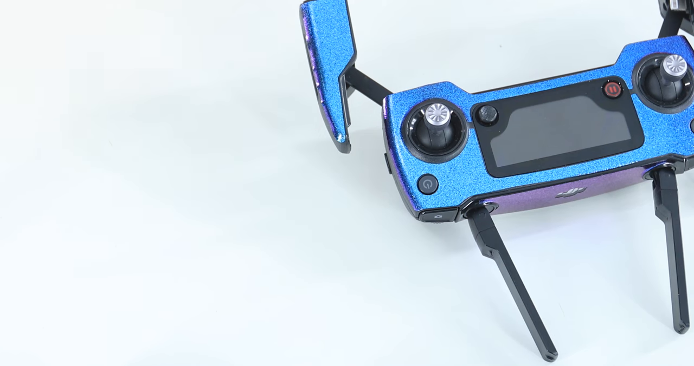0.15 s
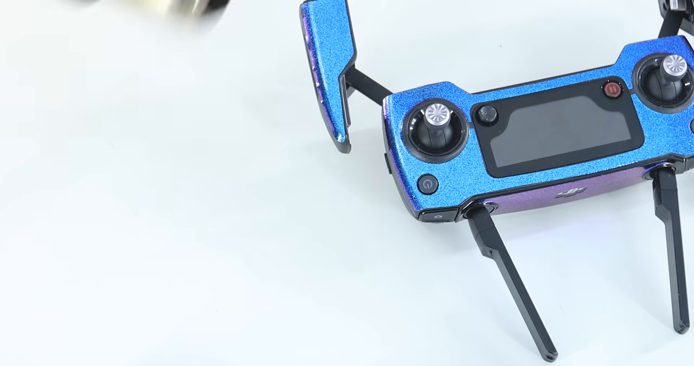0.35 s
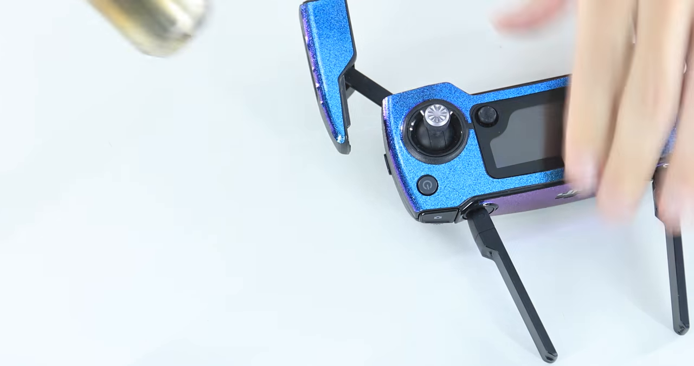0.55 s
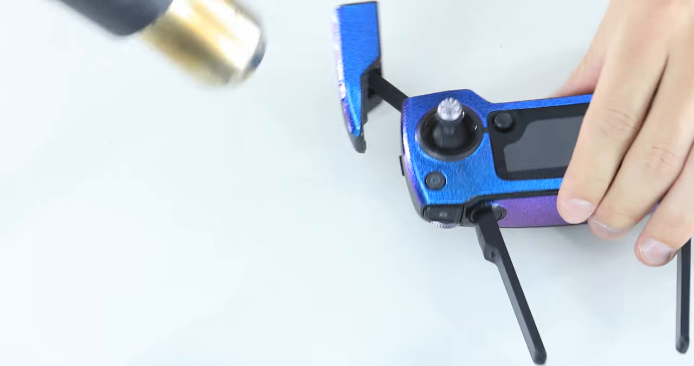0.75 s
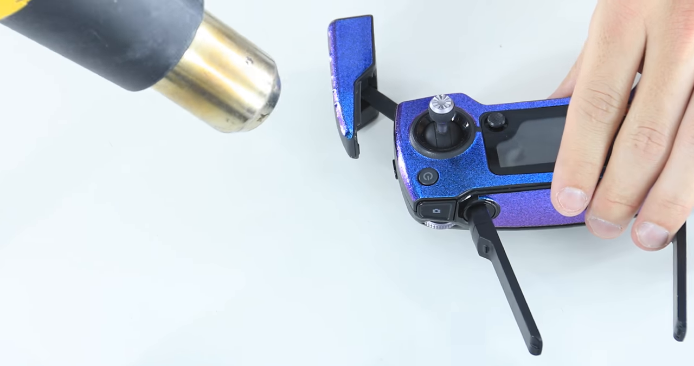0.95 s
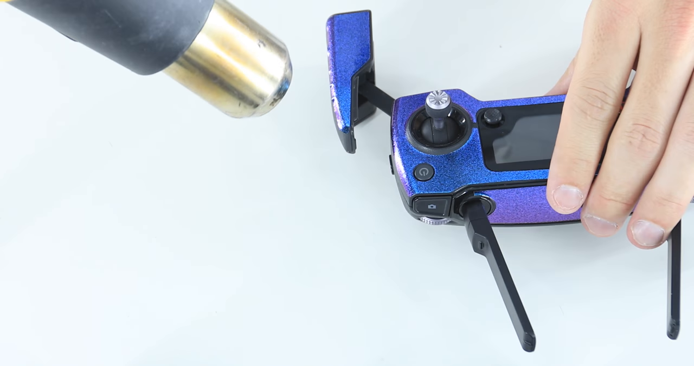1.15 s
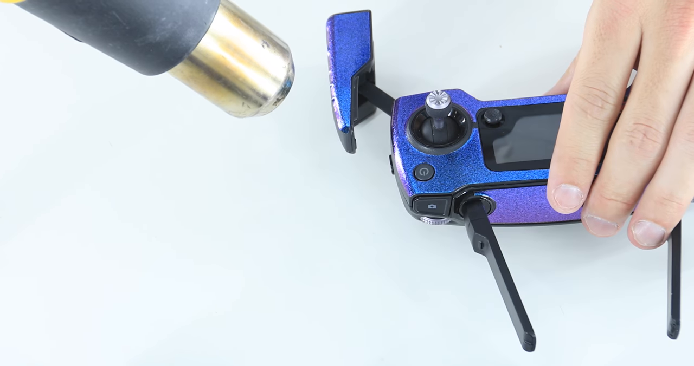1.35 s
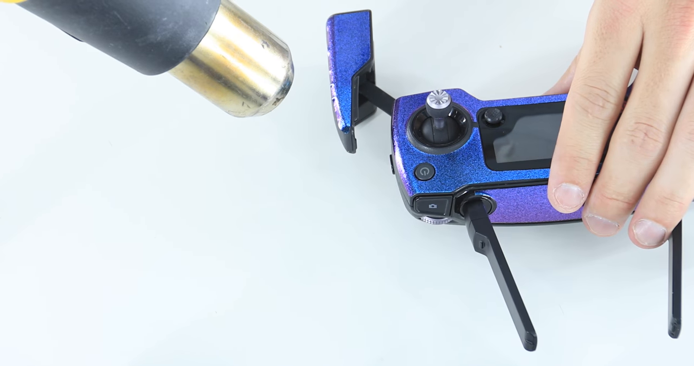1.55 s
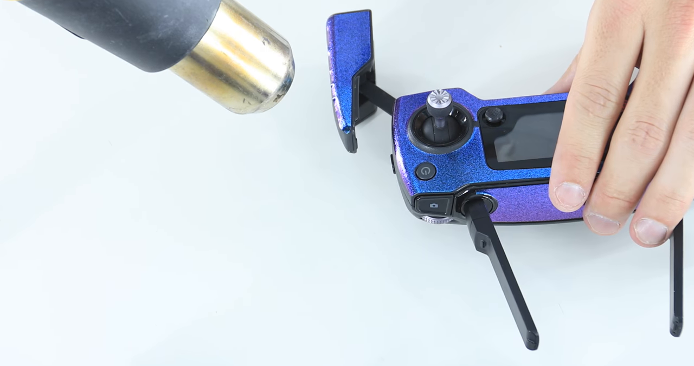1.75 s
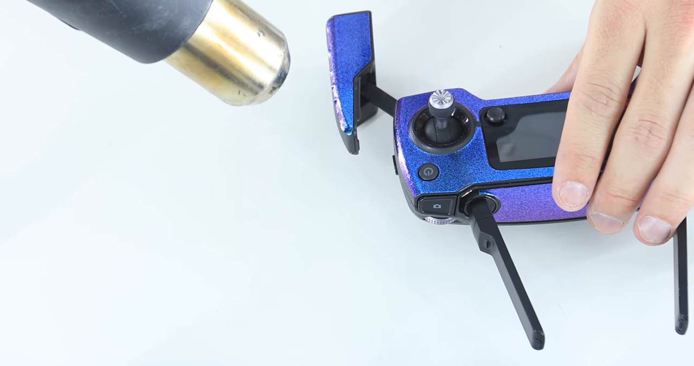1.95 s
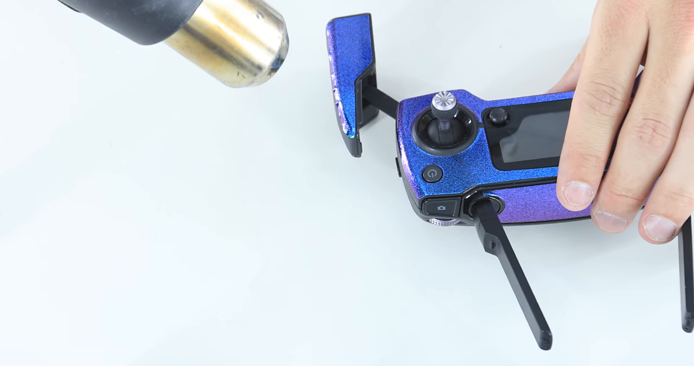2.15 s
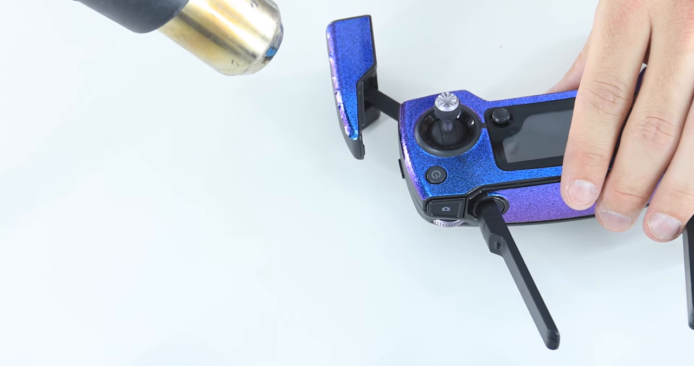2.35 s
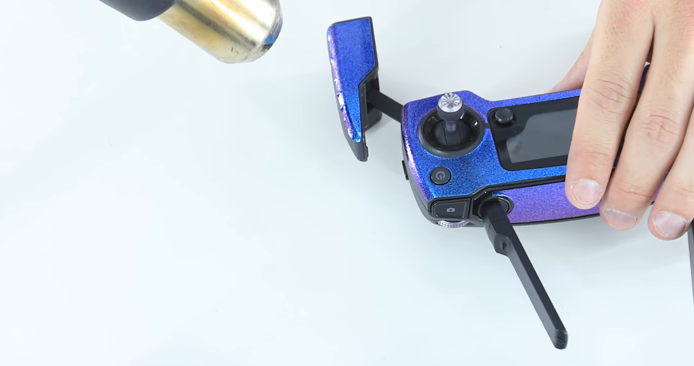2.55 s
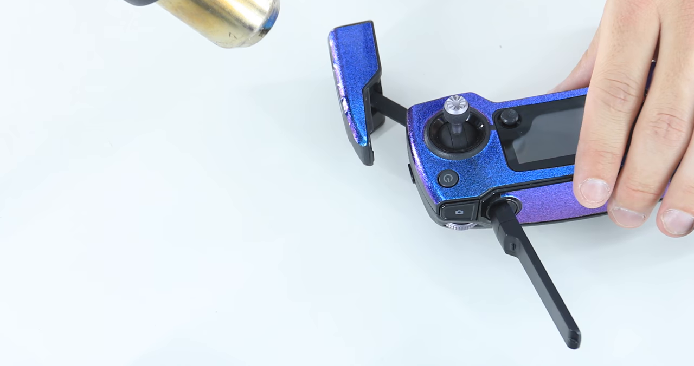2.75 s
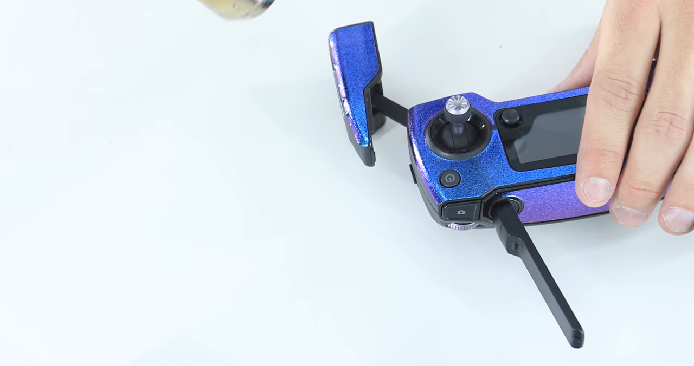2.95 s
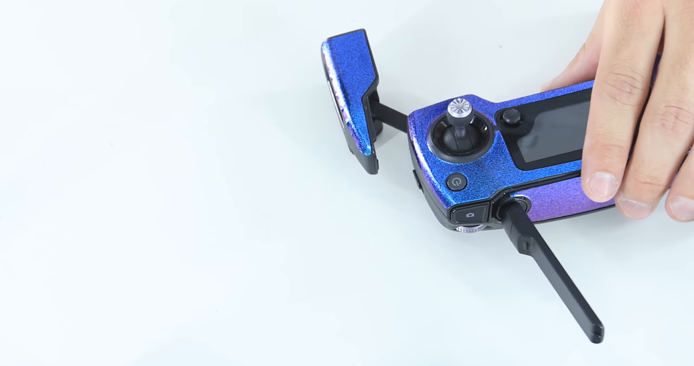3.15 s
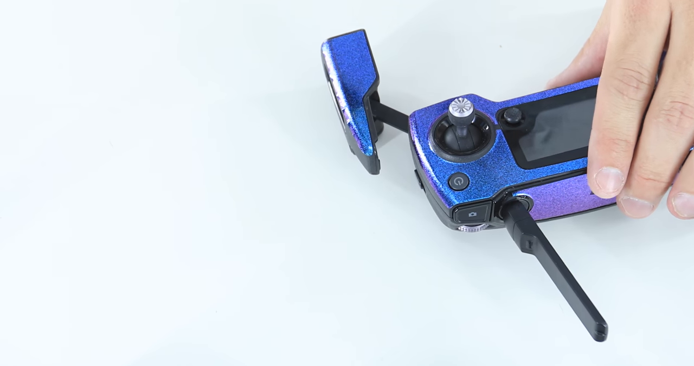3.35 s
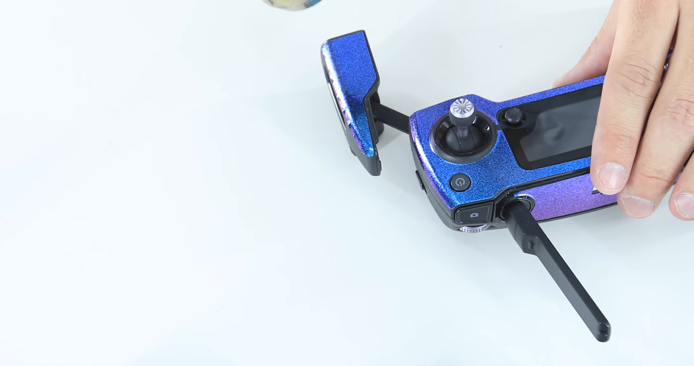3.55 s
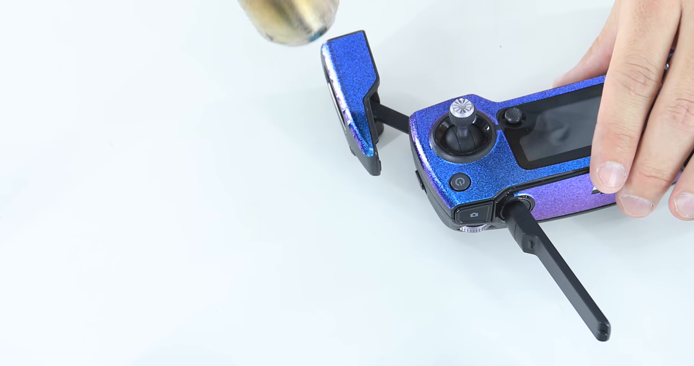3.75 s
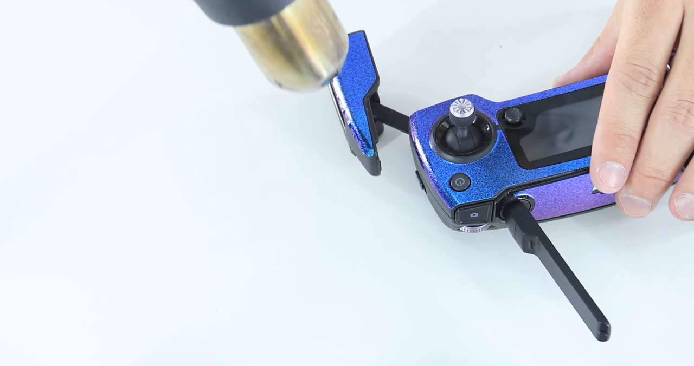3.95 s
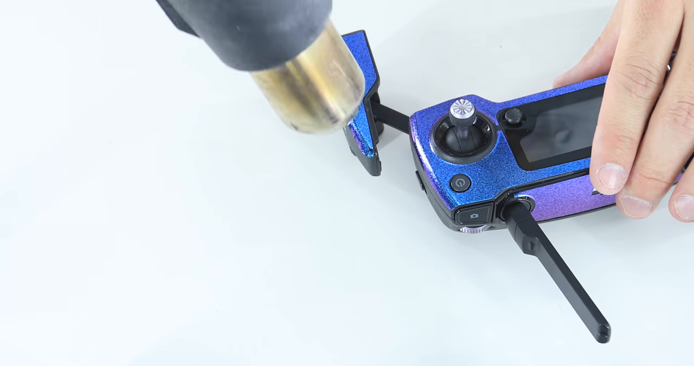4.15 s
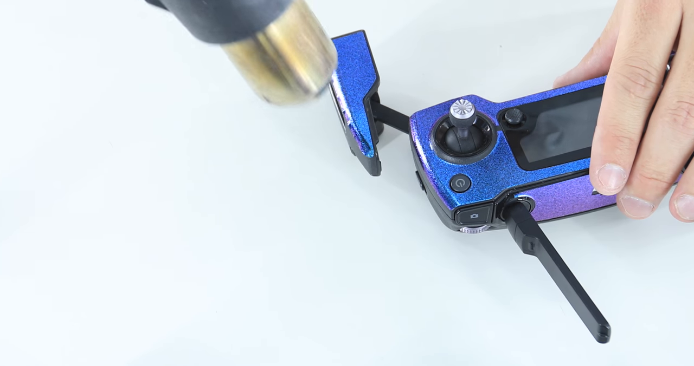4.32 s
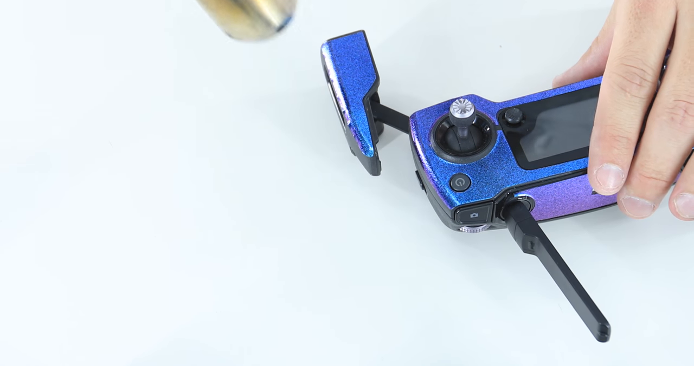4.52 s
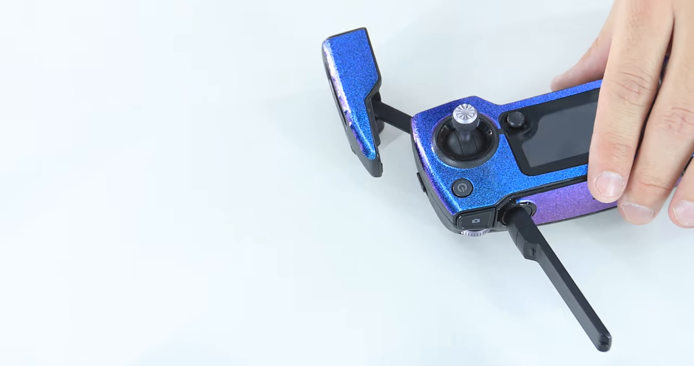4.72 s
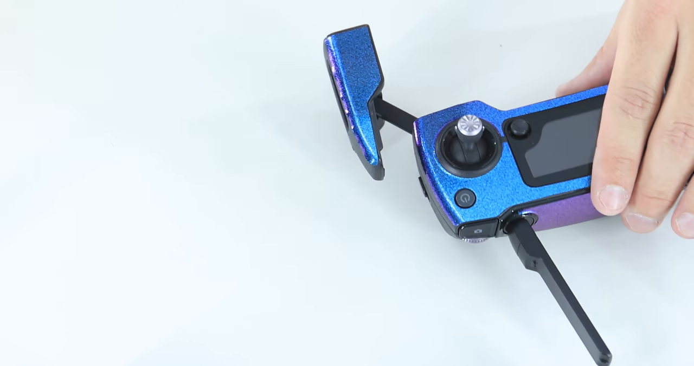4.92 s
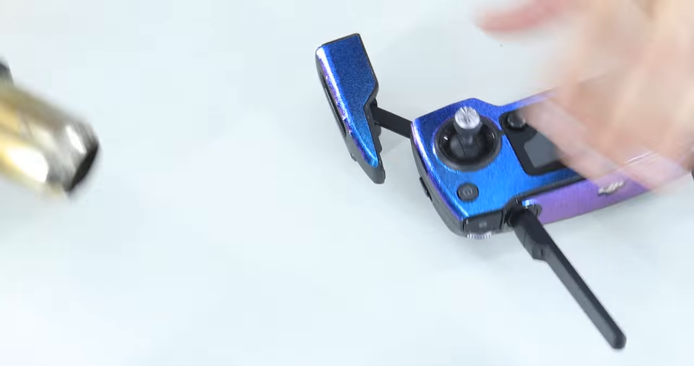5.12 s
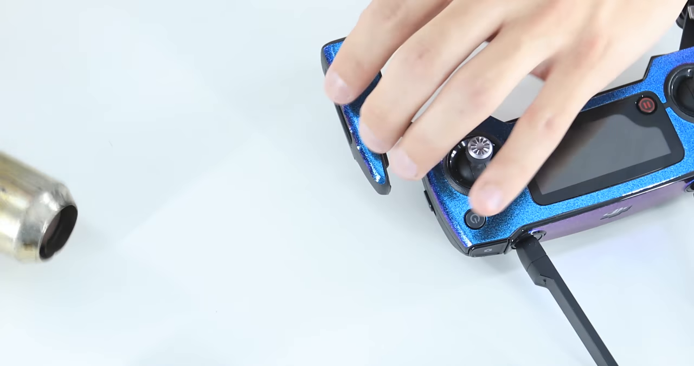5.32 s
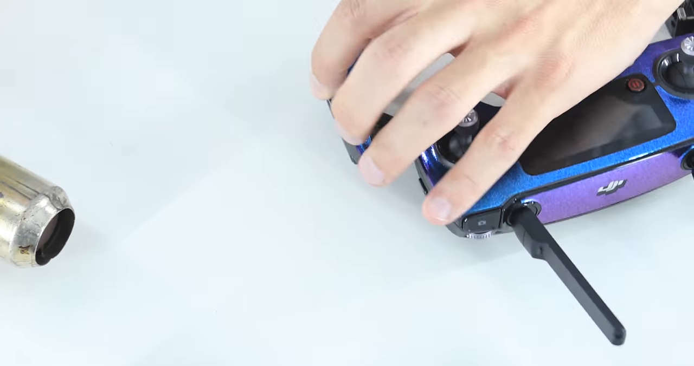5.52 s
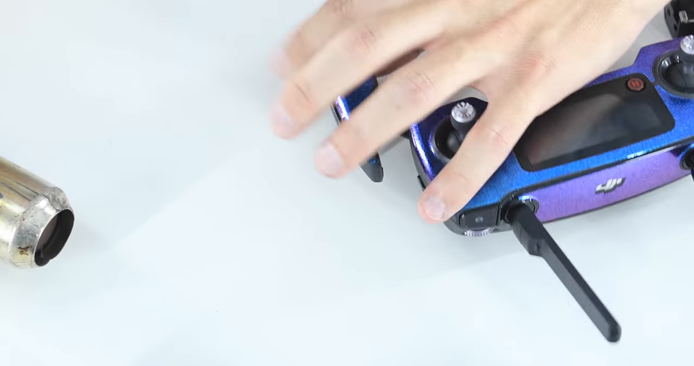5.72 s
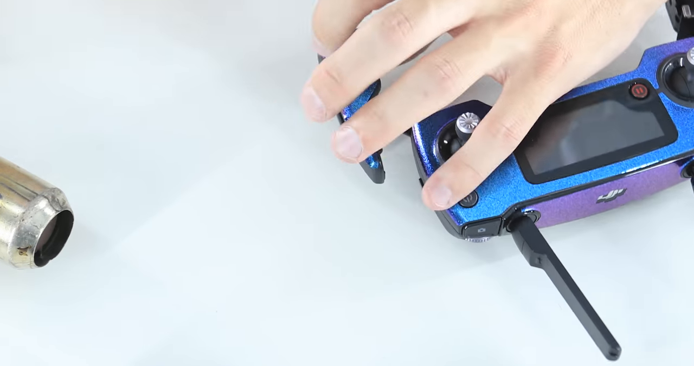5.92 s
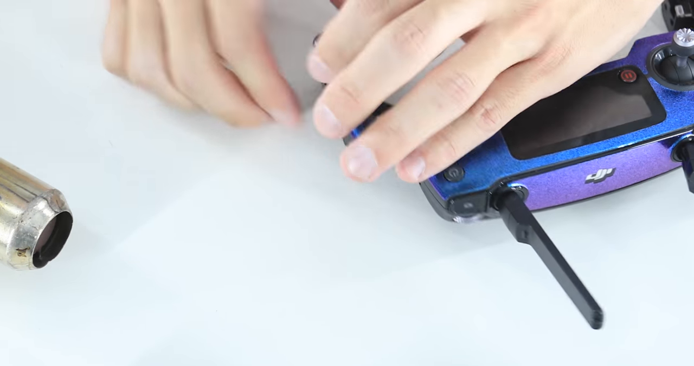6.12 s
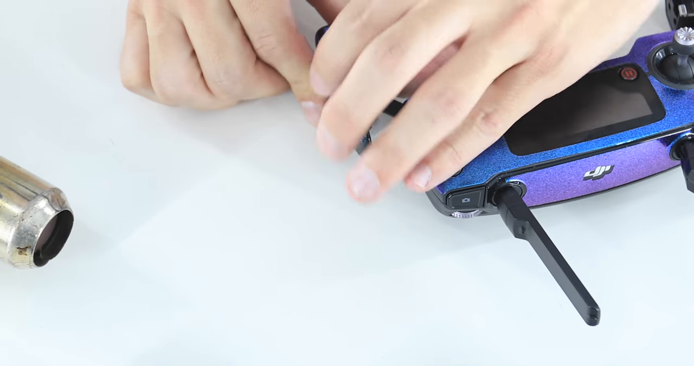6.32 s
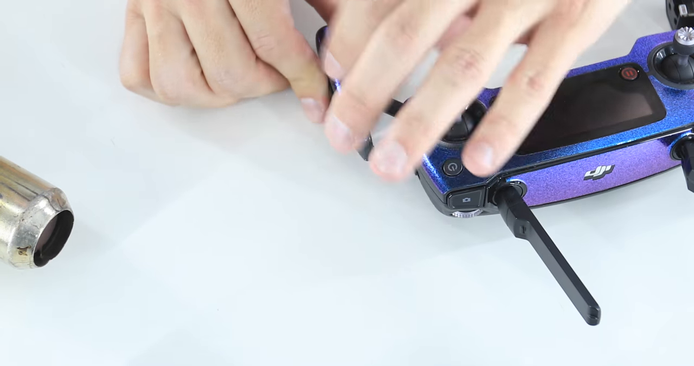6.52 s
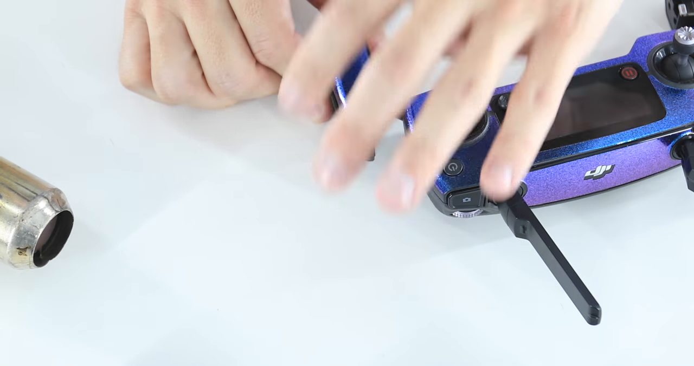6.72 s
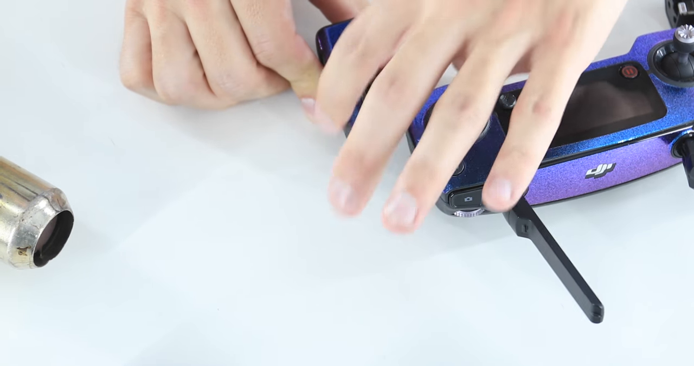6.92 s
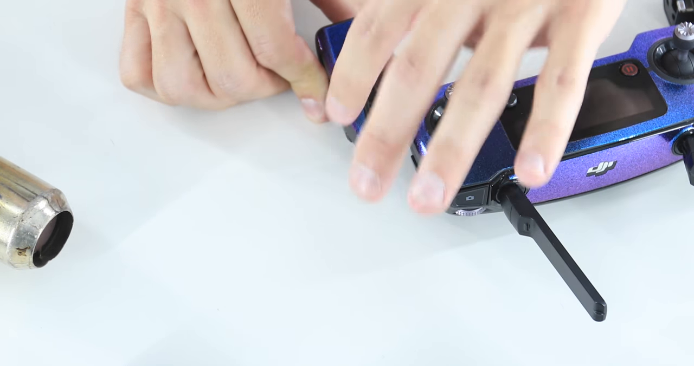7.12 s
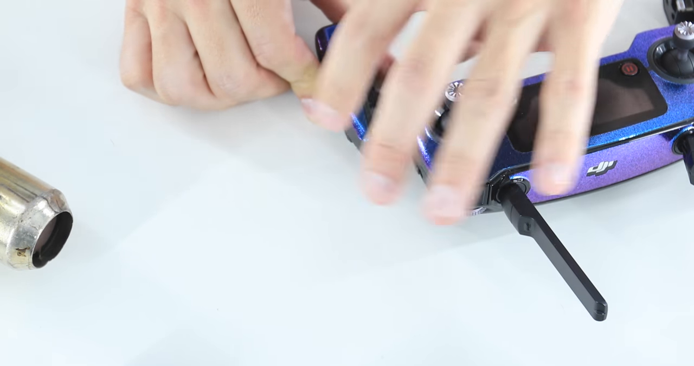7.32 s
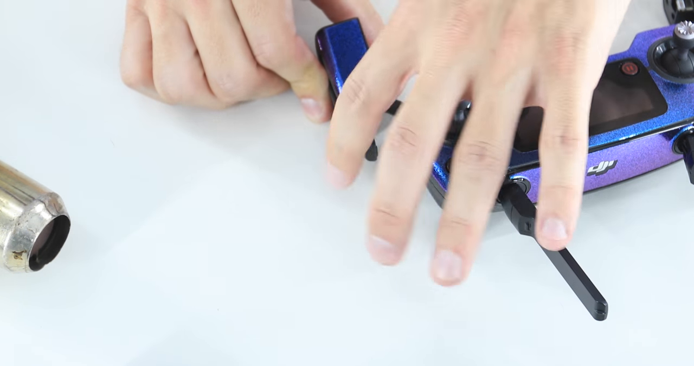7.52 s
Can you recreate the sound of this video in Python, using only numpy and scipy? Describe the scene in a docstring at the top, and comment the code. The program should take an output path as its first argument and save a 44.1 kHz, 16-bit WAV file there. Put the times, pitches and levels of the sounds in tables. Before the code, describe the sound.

Steady hot-air blower rush with a fine motor whine, clicked off and coasting down, followed by two hard table knocks and small plastic taps.

```python
"""In a small room with steady ventilation, a heat gun is switched on, turned about by the hand,
switched off and laid on a table; a plastic case is then handled on the same table.
The whine is a set of tones on multiples of the fan's shaft speed, the rush of air is shaped noise.
Switch and housing tick as short bursts, the table top rings in decaying modes, handling rustles as
soft noise, and sparse echoes form the room. One microphone hears it: both channels are alike."""
import sys
import numpy as np
from scipy import signal
from scipy.io import wavfile
from scipy.ndimage import uniform_filter1d

SR = 44100
rng = np.random.default_rng(int(sys.argv[2]) if len(sys.argv) > 2 else 0)


def persist_wave(psi):
    """Save psi, clipped to +-1, as 16-bit WAV."""
    counts = np.round(np.clip(psi, -1, 1) * 32767).astype(np.int16)
    wavfile.write(sys.argv[1], SR, np.atleast_2d(counts).T)


N = 338218

# Levels are relative within each source unless called rms.
# ventilation colour: (frequency [Hz], spectral level [dB])
VENT_COLOUR = [(20, -47), (50, -29), (100, -29), (135, -21.5), (200, -22.5), (300, -6.5), (550, -3.5),
               (750, -7), (1000, -7), (2700, -7.5), (4000, -13), (6000, -23), (10500, -37.5), (15900, -37)]
# resonances in the ventilation: (frequency [Hz], width [Hz], lift [dB])
VENT_PEAKS = [(169, 40, 11.5), (258, 9.8, 6.5), (494, 11, 8), (584, 24, 2), (855.5, 9.9, 18)]
VENT_RMS_DB = -46
# reverberation of the room: (frequency [Hz], t60 [s])
ROOM_T60 = [(150, 0.55), (600, 0.16), (2000, 0.34), (5000, 0.39), (12000, 0.12)]

# dull low thuds among the knocks: (time [s], level [dB], pitch [Hz])
THUDS = [(5.269, -41, 140), (5.395, -39, 70), (6.365, -44, 140)]
THUD_T60_S, THUD_RISE_S = 0.09, 0.0053

# modes of the table top: (frequency [Hz], level [dB], t60 before damping by what rests on it [s])
TABLE_MODES = [(163.5, -22.5, 0.23), (268, -32, 0.3), (342, -16.5, 0.16), (410, -18, 0.15),
               (556.4, -13, 0.17), (604, 4, 0.15), (596, -29, .07), (632, -23, 0.26), (857, -4, 0.061),
               (980, -28, 0.085), (1039, 3, 0.058), (1230, 3.5, 0.023), (1750, -42, 0.053),
               (2342, -20, 0.2), (2405, -13.5, .1), (2610, 0, 0.0094), (5400, -15, 0.0091)]
# knocks on the table top:
# (time [s], level [dB], hardness [dB per octave], clatter [dB], ring time [share of the free top])
KNOCKS = [(.486, -43, 2, 7, .7), (.519, -54, -8, -3, 0.63), (.962, -55.5, -17.5, 16.5, .54),
          (5.2677, -17, 5, -6.5, 0.9), (5.2885, -27, 2, 4.5, 1), (5.298, -19.5, -3.5, -1, 0.5),
          (5.396, -12.5, -2, -3, 1.18), (5.416, -27.5, 2.5, 7, 0.68), (5.455, -32, 5, 3.5, 0.51),
          (5.49, -45.5, 5.5, -1.5, 0.5), (5.669, -42, -13.5, 0.5, .99), (6.0924, -26.5, 1.5, -4, 0.59),
          (6.102, -29.5, 4, -7, 0.31), (6.11, -42, -12, 4, .6), (6.265, -35, -5, -2, 0.4),
          (6.27, -27, -10, -0.5, 0.5), (6.95, -51, -19, 11.5, 0.49), (6.971, -42, -1, -1, .6)]
CONTACT_MS = 0.15
# dense small modes of what is laid down: (frequency [Hz], spectral level [dB])
CLATTER_COLOUR = [(120, -42), (250, -25), (600, 4.5), (1000, 10.5), (1400, 2.5), (2400, -6.5),
                  (3600, -12.5), (6000, -26), (9000, -59), (15000, -51)]
# their decay: (frequency [Hz], t60 [s])
CLATTER_T60 = [(200, 0.28), (1000, 0.039), (3000, 0.13), (8000, .05)]
# things sliding on the table top, pressed ever harder and let go: (end [s], length [s], level [dB])
SLIDES = [(0.855, .16, -37), (5.696, 0.062, -45), (6.223, .04, -51), (6.435, .08, -44), (7.068, 0.058, -42),
          (7.608, .07, -45)]

# swells of hand and cable rustle: (peak time [s], level [dB], rise [dB per s], fall [dB per s])
RUSTLE_SWELLS = [(.17, -57, 35, 120), (.26, -38, 600, 909), (.31, -47, 254, 71), (5.3, -38.5, 171, 116),
                 (5.46, -51, 80, 192), (6.2, -62, 39, 40)]
# rustle colour: (frequency [Hz], spectral level [dB])
RUSTLE_COLOUR = [(1500, -33), (3000, 8), (4000, 4), (6100, 4), (7000, -2), (10500, -9), (14500, -9),
                 (16000, -6)]

# switch and housing ticks:
# (time [s], level [dB], centre [Hz], treble re level [dB], housing ring re level [dB])
TICKS = [(.048, -41.5, 4500, -14, -10), (.079, -44, 3000, -20, -6), (.1777, -30.5, 5030, -2, -14),
         (.183, -35.5, 3970, -11, -10), (.1907, -31, 3900, -20, -12), (.207, -37, 14000, -20, -20),
         (.2369, -22.5, 3960, -4, -16), (.238, -22.5, 1900, -30, -31), (.3, -22.5, 5200, -2, -28),
         (.302, -17, 2800, -1, -12.5), (.3605, -36, 12500, -15, -28), (.38, -36, 11100, -15, -28),
         (4.714, -29, 14000, -17, -28), (4.935, -30, 7000, -10, -28), (5.006, -26, 5200, -10, -28),
         (5.028, -32, 13000, -15, -28), (5.075, -23, 3000, -25, -20), (5.0867, -22, 5300, -7, -14),
         (5.186, -38, 7000, -7, -25), (5.209, -39, 9000, -3, -26), (5.228, -38, 10000, 2, -28),
         (5.2675, -32.5, 5500, -18, -15), (5.2965, -22.5, 3670, -27, 0), (5.309, -27, 3700, -20, -3),
         (5.3953, -24.5, 4470, -21, -9), (5.4085, -26, 3500, -22, -4), (5.533, -52, 4100, -30, 9.5),
         (6.093, -44, 2600, -22, -18), (6.272, -47, 2800, -20, -16), (6.961, -40.5, 4780, -20, -28),
         (6.973, -45, 5200, -22, -28), (7.312, -50, 5500, -22, -28), (7.3193, -42, 5450, -22, -28)]
TICK_T60_S = 0.015
# modes of the housing: (frequency [Hz], level [dB], t60 [s])
HOUSING_MODES = [(2810, 5, 0.05), (3540, 5, 0.05), (4070, -4.5, 0.084), (5310, 1, 0.021), (6140, -9, 0.09),
                 (7800, -17, .05)]

ON_S, SPIN_UP_S = .299, .065  # switch on, time constant
OFF_S, RUN_DOWN_S = 5.04, .19  # switch off, time constant
# running speed of the shaft, which sags when the gun is jerked away: (time [s], speed [turns per s])
RUNNING_SPEED = [(.75, 395.5), (.86, 397.6), (.99, 395.4), (1.62, 396.7), (2.3, 394.9), (2.7, 397.5),
                 (3.2, 398), (3.46, 399.3), (3.61, 395.3), (3.76, 395.9), (3.87, 400.5), (4.2, 400.3),
                 (4.31, 399), (4.57, 396.6), (4.69, 401.1), (4.76, 386), (4.86, 397)]

# air through start, running and coasting, before the loss with falling speed:
# (time [s], barrel resonance [dB], rush [dB], intake fizz [dB])
AIR_LEVELS = [(.4, -46, -33, -34), (.7, -36, -35, -40), (1.1, -32, -34, -39.5), (2.5, -32.5, -34, -39.5),
              (3.0, -32.5, -36, -38.5), (3.2, -40, -37.5, -40.5), (4.35, -34.5, -38, -41.5),
              (4.7, -36.5, -34, -39), (4.8, -32, -35, -35.5), (5.05, -63, -29.5, -36)]
ROAR_DB, HISS_DB = -33, -35.5
# where one of the five parts of the air hands over to the next: [Hz]
AIR_EDGES_HZ = [2063, 2810, 4700, 10000]
# loss per halving of the shaft speed [dB]: (roar, barrel, rush, hiss, fizz)
AIR_FALL_DB = [12, 8.9, 25, 8.6, 8.3]
# air colour: (frequency [Hz], spectral level [dB])
AIR_COLOUR = [(120, -63), (200, -30), (500, -14.5), (1080, -15.5), (1550, -4), (2200, -6.5), (2460, 2),
              (2950, -9), (3540, -2.5), (4580, -11), (5110, -6), (5810, -17.5), (7640, -13), (9880, -24),
              (15900, -14.5)]
# resonances of barrel and housing in the air: (frequency [Hz], width [Hz], lift [dB])
BARREL_PEAKS = [(491, 28, 8), (935, 96, 7), (1625, 73, -4.5), (1860, 40, -4), (1896, 14.5, 6),
                (2356, 96, 4), (2592, 17, 10), (3404, 340, -2), (4750, 600, -1), (6650, 82, -6),
                (8300, 140, 4), (10770, 290, 3.5), (11400, 220, -4.5), (13500, 180, -12), (14750, 310, 8)]
# the nozzle starts to swing aside, is aside, starts back, is back: times [s]
TURNED_S = [3.0, 3.2, 4.55, 4.75]
# change of the resonances meanwhile: (frequency [Hz], width [Hz], lift [dB])
TURNED_PEAKS = [(2330, 100, -1), (6270, 300, -4), (8950, 300, -2), (9200, 300, -8), (10900, 300, -1),
                (11560, 300, -4), (13600, 300, 4), (14700, 500, -4)]

# whine through start, running and coasting, before the loss with falling speed:
# (time [s], 5th multiple [dB], 7th [dB], 10th [dB], 13th [dB], all other multiples [dB])
WHINE_LEVELS = [(.35, -49, -52, -54, -50, -52), (.39, -40, -57, -47, -47, -42),
                (.47, -43, -52, -58, -47, -43), (.57, -42, -47, -60, -41, -46),
                (.7, -46.5, -49, -62, -41.5, -43.5), (1.5, -43, -45, -55, -42, -43.5),
                (1.9, -45, -41, -49, -42, -42.5), (2.7, -44, -46, -49, -45, -45),
                (3.5, -44.5, -43, -50, -39, -43.5), (4.3, -52, -42, -54, -41.5, -45.5),
                (4.72, -41, -44, -53, -39, -46), (4.77, -47, -55, -60, -62, -62),
                (4.84, -50, -47, -51, -44, -44), (5.03, -48, -41, -59, -50, -50),
                (5.11, -45, -48, -37, -50, -50), (5.16, -42, -48, -48, -50, -47),
                (5.25, -62, -48, -32, -50, -50)]
# the other multiples of the shaft speed: (multiple, level re their common level [dB])
OTHER_MULTIPLES = [(3, -21), (4, -10), (6, -2), (8, -10.5), (9, -5.5), (11, -8), (12, -18), (14, -1),
                   (15, -7), (16, -4.5), (17, -5.5), (18, -14), (19, -24), (20, -23), (21, -12.5),
                   (22, -14.5), (23, -16), (24, -24), (26, -21), (27, -18), (28, -22), (29, -14.5),
                   (30, -18), (33, -20), (34, -19), (35, -20), (36, -25), (38, -18)]
# motor case resonance that lifts a tone gliding through it: (frequency [Hz], width [Hz], lift [dB])
MOTOR_CASE = [(1317, 460, 13.5)]
COMMUTATOR_MULTIPLES = (5, 10)
COMMUTATOR_FALL_DB, BLADE_FALL_DB = 12.5, 20  # lost per halving of the shaft speed
RIPPLE_HZ = 120  # rectified mains shakes the motor torque

EDGE_HZ = 15950  # upper band limit

# bins and frames of the short-time spectra
BINS_HZ = np.fft.rfftfreq(2048, 1 / SR)
FRAMES_S = np.arange(N // 256 + 9) * 256 / SR


def gain_of(db):
    """Amplitude ratio of a level: twenty decibels per factor of ten."""
    return 10 ** (np.asarray(db) / 20)


def evened(x):
    """Normalisation to unit root mean square."""
    return x / np.sqrt(np.mean(x ** 2) + 1e-20)


def read(points, hz):
    """Interpolation of a spectral curve on a logarithmic frequency axis."""
    f, value = np.transpose(points)
    return np.interp(np.log(hz + 1), np.log(f + 1), value)


def columns(rows, t):
    """Linear interpolation in time of each column of a curve table."""
    s, *values = np.transpose(rows)
    return [np.interp(t, s, v) for v in values]


def add(mix, s, sound):
    """Superposition of a sound on the mix from time s."""
    part = mix[round(s * SR):][:len(sound)]
    part += sound[:len(part)]


def humps(peaks, hz):
    """Resonance: bell-shaped peaks summed in dB."""
    return sum(db / (1 + (2 * (hz - f) / width) ** 2) for f, width, db in peaks)


def noise(gain, patchy_db):
    """Random short-time spectra, shaped by gain (bins x frames), with drifting patches of level."""
    a, b, patches = rng.standard_normal((gain.shape[1], 1025, 3)).T
    patches = uniform_filter1d(patches, size=10, axis=0)
    patches = evened(uniform_filter1d(patches, size=24, axis=1))
    spectra = (a + 1j * b) * gain * gain_of(patchy_db * patches)
    return signal.istft(spectra, nperseg=2048, noverlap=1792)[1][:N]


def wander(per_s):
    """Slow random fluctuation: chance steps joined by straight lines."""
    steps = rng.standard_normal(1600)
    return np.interp(np.arange(N) / SR * per_s, np.arange(1600), steps)


def ventilation():
    """Stationary broadband noise coloured by resonances."""
    colour = gain_of(read(VENT_COLOUR, BINS_HZ) + humps(VENT_PEAKS, BINS_HZ))
    steady = np.outer(colour, np.ones_like(FRAMES_S))
    return gain_of(VENT_RMS_DB) * evened(noise(steady, patchy_db=1.5))


def room(x):
    """Reverberation: sparse echoes of random sign, each band decaying at its own rate."""
    taps = np.zeros(SR)
    at = np.arange(200, SR - 20, 20)
    taps[at + rng.integers(0, 20, len(at))] = rng.choice([-1., 1.], len(at))
    hz, t, z = signal.stft(taps, SR, nperseg=256)
    decay = gain_of(-60 * t / read(ROOM_T60, hz)[:, None])
    tail = signal.istft(z * decay, SR, nperseg=256)[1]
    return signal.oaconvolve(x, tail / np.linalg.norm(tail))[:N]


def radiated(x):
    """Inefficient low-frequency radiation: small parts and a small table top send out little bass."""
    return signal.sosfilt(signal.butter(3, 290, "high", fs=SR, output="sos"), x)


def thuds():
    """Damped oscillation: a low sine rises smoothly and dies at once."""
    out, t = np.zeros(N), np.arange(SR // 5) / SR
    for s, db, hz in THUDS:
        swell = gain_of(db - 60 * t / THUD_T60_S) * (1 - np.exp(-t / THUD_RISE_S))
        add(out, s, swell * np.sin(2 * np.pi * hz * t))
    return out


def ring(hardness_db, detune, free=0.85):
    """Modal response to a blow: hardness wakes the upper modes, a resting hand shortens them all."""
    t = np.arange(SR // 2) / SR
    out = 0
    for (hz, db, t60), d in zip(TABLE_MODES, detune):
        level_db = db + hardness_db * np.log2(hz / 600) - 60 * t / (t60 * free)
        out = out + gain_of(level_db) * np.sin(2 * np.pi * hz * d * t)
    return out


def clatter(hardness_db, chance):
    """High modal density: modes too many to tell apart act as noise that dies band by band."""
    hz, t, z = signal.stft(chance, SR, nperseg=256, noverlap=224)
    colour_db = read(CLATTER_COLOUR, hz) + hardness_db * np.log2((hz + 100) / 600)
    decay_db = 60 * t / read(CLATTER_T60, hz)[:, None]
    sound = signal.istft(z * gain_of(colour_db[:, None] - decay_db), SR, nperseg=256, noverlap=224)[1]
    onset = np.minimum(np.arange(len(sound)) / 30, 1)
    return sound / np.sqrt(np.mean(sound[:400] ** 2)) * onset


def knocks():
    """Impact excitation: a short push rings the table and rattles what is laid down."""
    out = np.zeros(N)
    draws = rng.standard_normal((len(KNOCKS), SR // 3))
    push = np.hanning(3 + round(CONTACT_MS * SR / 1000))
    push = push / push.sum()
    for (s, db, hardness_db, clatter_db, free), chance in zip(KNOCKS, draws):
        detune = 1 + 0.013 * chance[:len(TABLE_MODES)]
        add(out, s, gain_of(db) * np.convolve(ring(hardness_db, detune, max(free, .1)), push))
        add(out, s, gain_of(db + clatter_db) * clatter(hardness_db, chance))
    return out


def slides():
    """Friction excitation: rubbing noise drives the table modes, faintly between the slides too."""
    t, release_s = np.arange(N) / SR, .015
    level = 0
    for end, length, db in SLIDES:
        times = [end - length, end - 0.18 * length, end, end + release_s]
        # the end values hold before and after the slide
        level = level + gain_of(db) * np.interp(t, times, [0.042, 0.72, 0.16, 0.053])
    modes = ring(-5.0, np.ones(len(TABLE_MODES)))
    return signal.oaconvolve(level * rng.standard_normal(N), modes / np.linalg.norm(modes))[:N]


def rustle():
    """Friction noise: soft bright swells while the gun and the case are handled."""
    colour, t = gain_of(read(RUSTLE_COLOUR, BINS_HZ)), np.arange(N) / SR
    level = 0
    for s, db, rise, fall in RUSTLE_SWELLS:
        level = level + gain_of(db - np.where(t < s, rise * (s - t), fall * (t - s)))
    flutter = gain_of(2.5 * wander(per_s=37))
    return flutter * level * evened(noise(np.outer(colour, np.ones_like(FRAMES_S)), patchy_db=3))


def ticks():
    """Transient release: snapping plastic gives a burst and a bright edge, and the housing rattles on."""
    out, t = np.zeros(N), np.arange(SR // 4) / SR
    spread, rattle_s = 1.35, .004  # band edges as a ratio to the centre; smoothing of the rattle
    bright = signal.butter(2, 7000, "high", fs=SR, output="sos")
    bursts = rng.standard_normal((len(TICKS), 2 + len(HOUSING_MODES), len(t)))
    for (s, db, hz, treble_db, ring_db), burst in zip(TICKS, bursts):
        band = signal.butter(1, [hz / spread, hz * spread], "band", fs=SR, output="sos")
        body = evened(signal.sosfilt(band, burst[0]))
        edge = evened(signal.sosfilt(bright, burst[1]))
        add(out, s, gain_of(db - 60 * t / TICK_T60_S) * (body + gain_of(treble_db) * edge))
        # loose parts chop each mode
        rattle = evened(uniform_filter1d(burst[2:], size=round(rattle_s * SR), axis=1))
        housing = 0
        for (f, mode_db, t60), chop in zip(HOUSING_MODES, rattle):
            housing = housing + gain_of(mode_db - 60 * t / t60) * np.sin(2 * np.pi * f * t) * chop
        add(out, s, gain_of(db + ring_db) * housing)
    return out


def speed(t):
    """First-order lag [turns per s]: the shaft nears its running speed, then coasts down."""
    spin_up = 1 - np.exp(-np.maximum(t - ON_S, 1e-4) / SPIN_UP_S)
    run_down = np.exp(-np.maximum(t - OFF_S, 0) / RUN_DOWN_S)
    return columns(RUNNING_SPEED, t)[0] * spin_up * run_down


def halvings(t):
    """Speed ratio in octaves: how far the shaft is below its running speed."""
    return np.log2(columns(RUNNING_SPEED, t)[0] / speed(t))


def air():
    """Turbulent flow noise: each part grows with fan speed; three also follow level curves in time."""
    colour = gain_of(read(AIR_COLOUR, BINS_HZ) + humps(BARREL_PEAKS, BINS_HZ))
    above = [1 / (1 + (edge / (BINS_HZ + 1)) ** 16) for edge in AIR_EDGES_HZ]
    shares = -np.diff([np.ones_like(BINS_HZ), *above, np.zeros_like(BINS_HZ)], axis=0)
    barrel_db, rush_db, fizz_db = columns(AIR_LEVELS, FRAMES_S)
    levels_db = (ROAR_DB, barrel_db, rush_db, HISS_DB, fizz_db)
    slow = halvings(FRAMES_S)
    power = 0
    for share, db, fall in zip(shares, levels_db, AIR_FALL_DB):
        spectrum = share * colour ** 2
        # doubled dB turn amplitude gain into power gain
        power = power + np.outer(spectrum / np.sum(spectrum), gain_of(2 * (db - fall * slow)))
    turned = np.interp(FRAMES_S, TURNED_S, [0, 1, 1, 0])
    turning = gain_of(np.outer(humps(TURNED_PEAKS, BINS_HZ), turned))
    return noise(np.sqrt(power) * turning, patchy_db=1.0)


def blurred(share, per_s):
    """Scattering: complex envelope of a tone, a share of its power spread by the turbulence around it."""
    return np.sqrt(1 - share) + np.sqrt(share / 2) * (wander(per_s) + 1j * wander(per_s))


def whine():
    """Harmonics of rotation: blades and commutator sound on shaft multiples, higher ones blurring faster."""
    t = np.arange(N) / SR
    shaft, slow = speed(t), halvings(t)
    turns = np.cumsum(shaft * (1 + .0009 * wander(per_s=25))) / SR
    *main_db, other_db = columns(WHINE_LEVELS, t)
    tones = list(zip((5, 7, 10, 13), main_db))
    tones += [(round(k), other_db + db) for k, db in OTHER_MULTIPLES]
    out = 0
    for k, db in tones:
        if k in COMMUTATOR_MULTIPLES:
            fall_db, scattered = COMMUTATOR_FALL_DB, .2
        else:
            fall_db, scattered = BLADE_FALL_DB, .45
        level_db = db - slow * fall_db + humps(MOTOR_CASE, k * shaft)
        envelope = blurred(scattered, per_s=min(9 * k, 200))
        tone = (envelope * np.exp(2j * np.pi * k * turns)).real
        out = out + np.sqrt(2) * gain_of(level_db) * tone
    return (1 + 0.22 * np.cos(2 * np.pi * RIPPLE_HZ * t)) * out


def scene():
    """Superposition of the direct sounds, their echoes, the thuds and the ventilation."""
    gun = air() + whine()
    taps = radiated(ticks()) + rustle()
    table = radiated(knocks() + slides())
    echoes = room(gain_of(-11) * gun + gain_of(-9.5) * taps + gain_of(-8) * table)
    return np.tile(gun + taps + table + echoes + thuds() + ventilation(), (2, 1))


def record(dry):
    """Limited range: peaks are clipped at full scale, then a low-pass filter limits the band."""
    band_limit = signal.firwin(1023, EDGE_HZ, window=("kaiser", 9), fs=SR)
    return signal.oaconvolve(np.clip(dry, -1, 1), band_limit[None], "same")


dry = scene()
out = record(dry)
persist_wave(out)
```